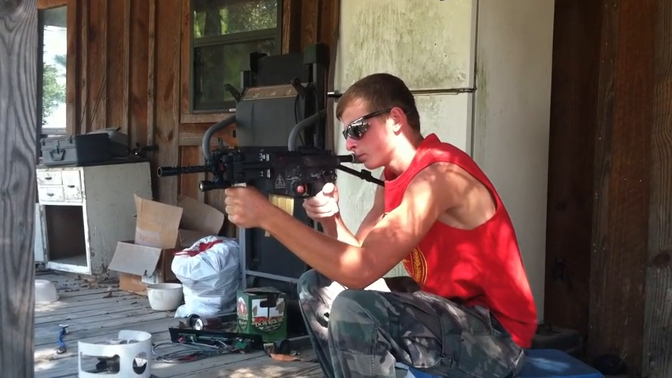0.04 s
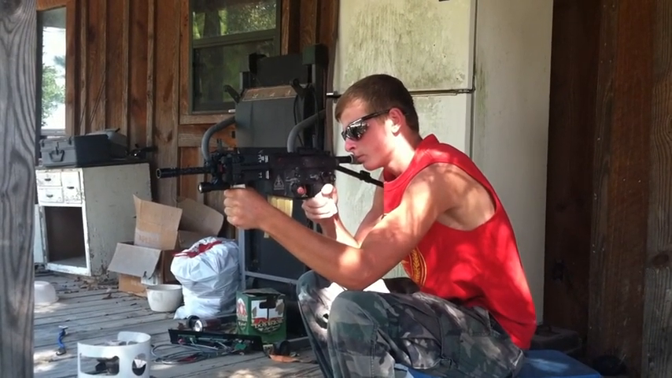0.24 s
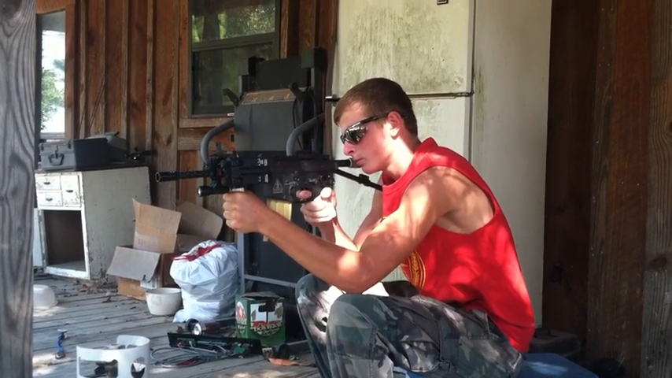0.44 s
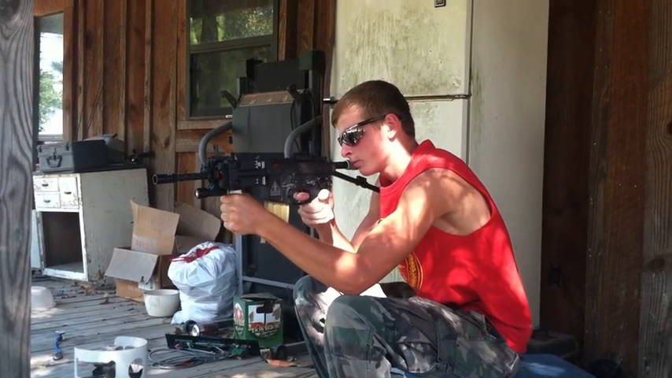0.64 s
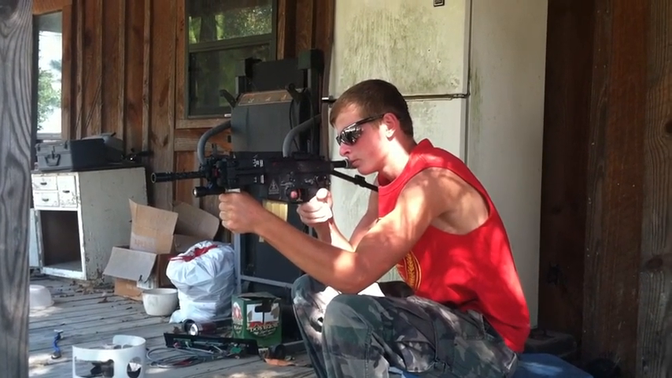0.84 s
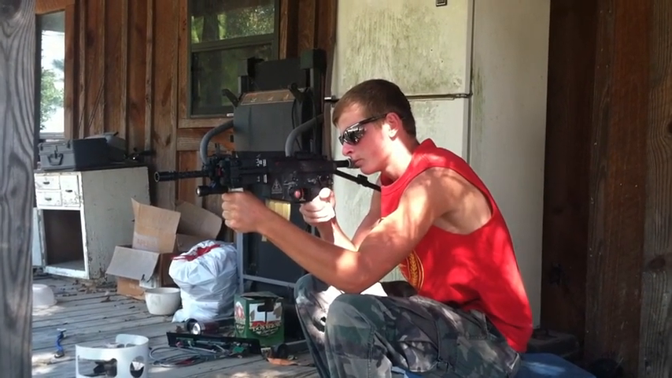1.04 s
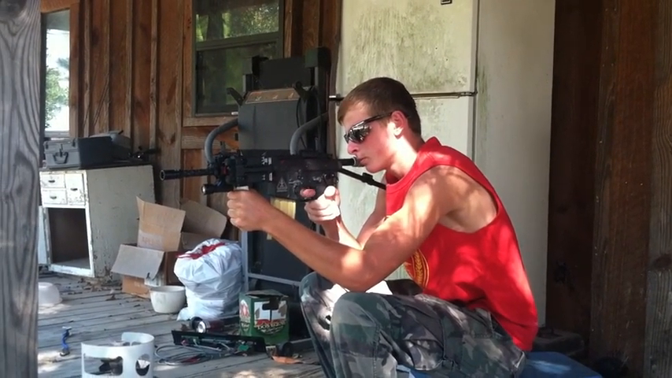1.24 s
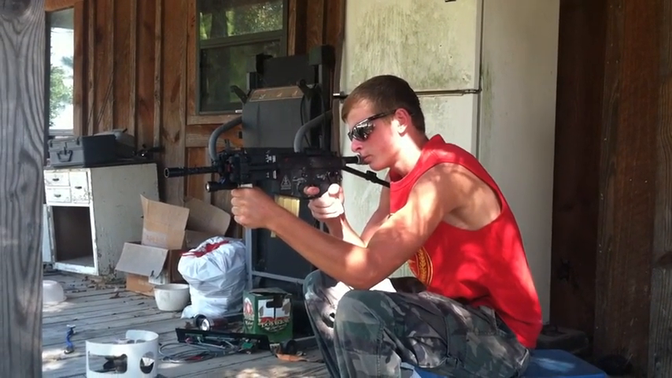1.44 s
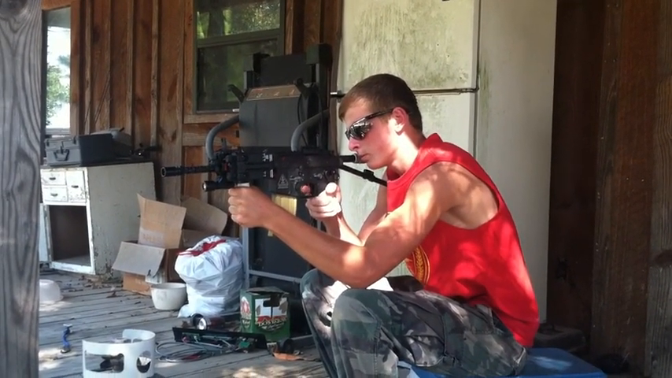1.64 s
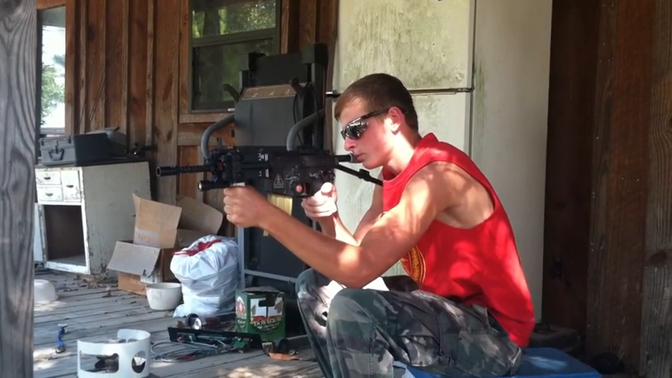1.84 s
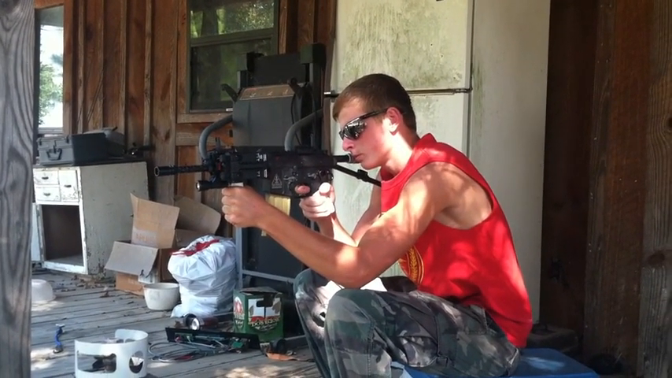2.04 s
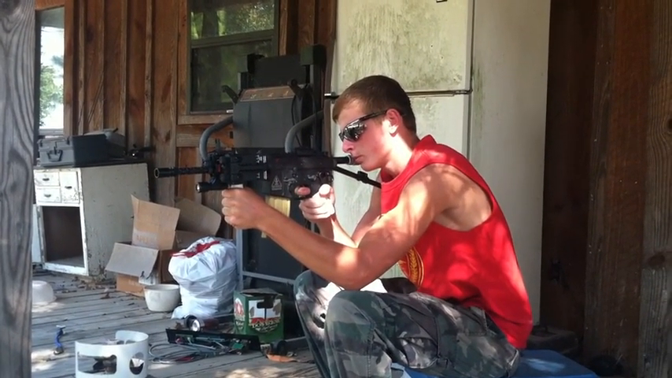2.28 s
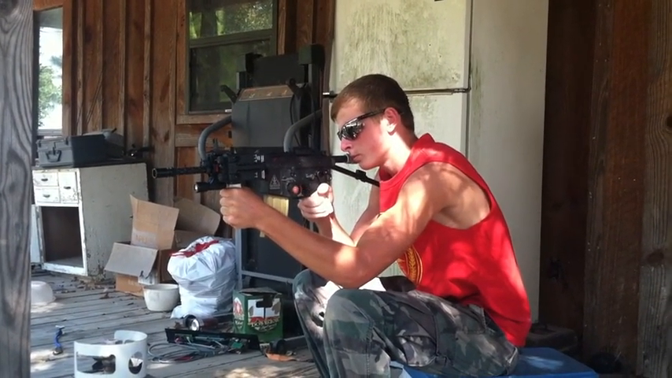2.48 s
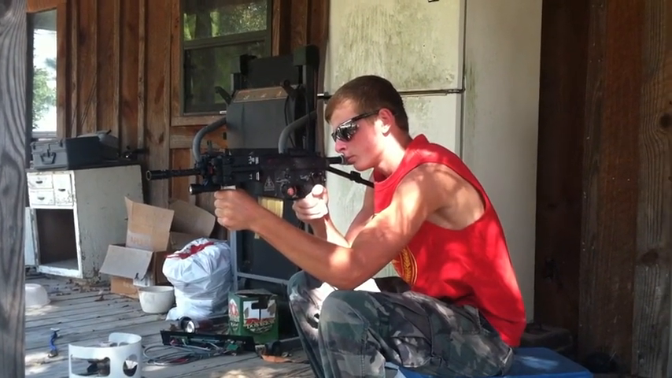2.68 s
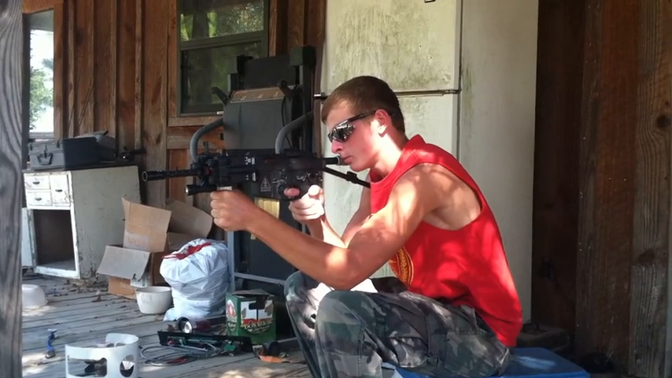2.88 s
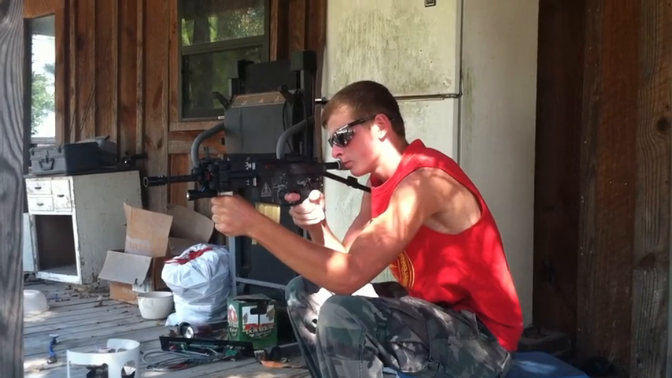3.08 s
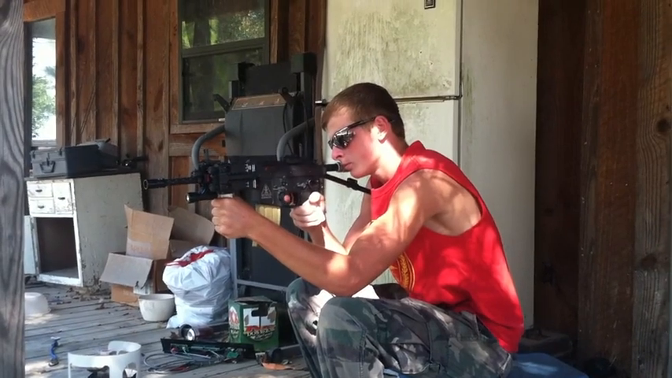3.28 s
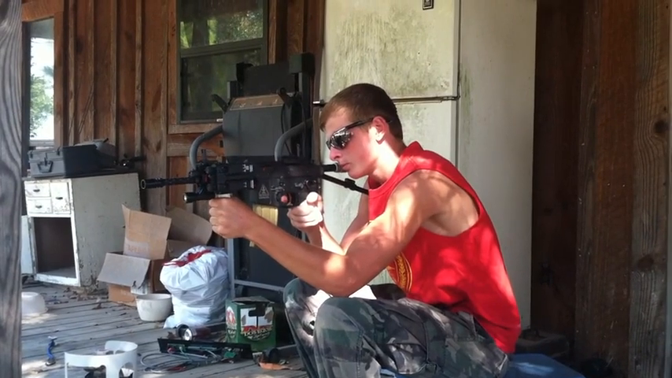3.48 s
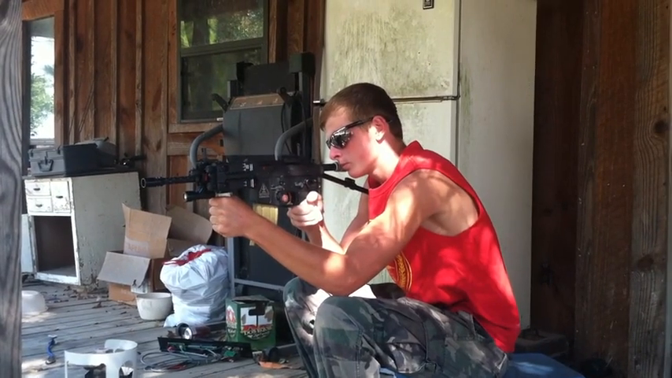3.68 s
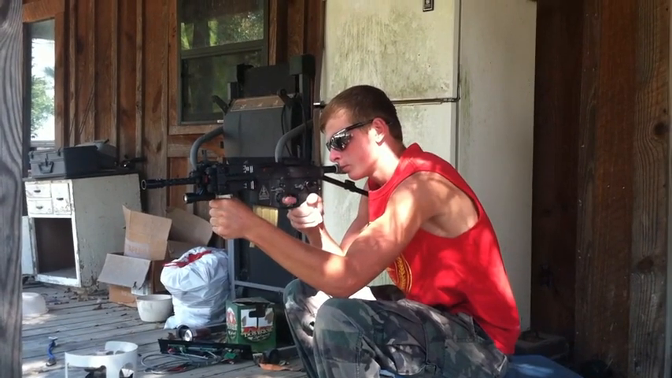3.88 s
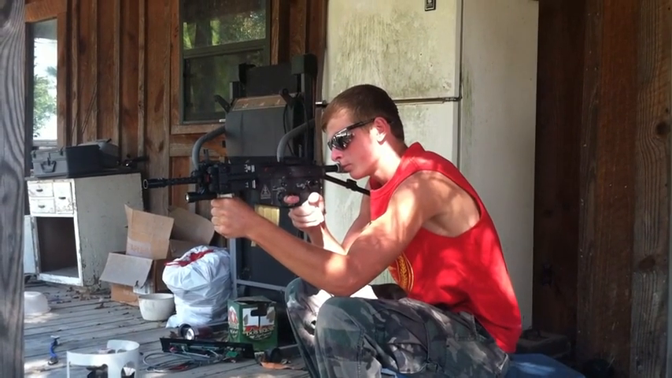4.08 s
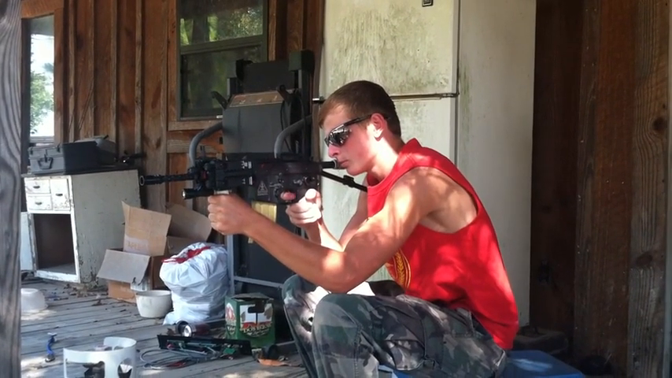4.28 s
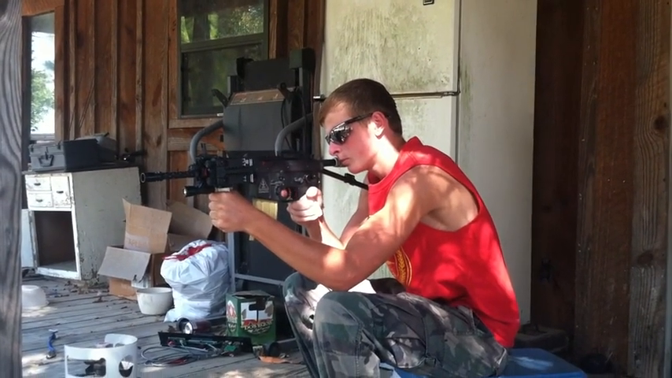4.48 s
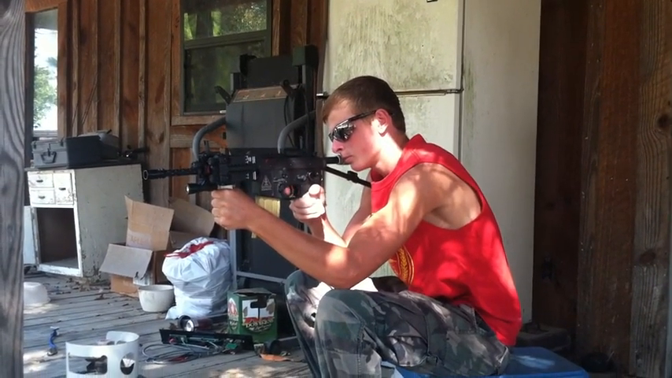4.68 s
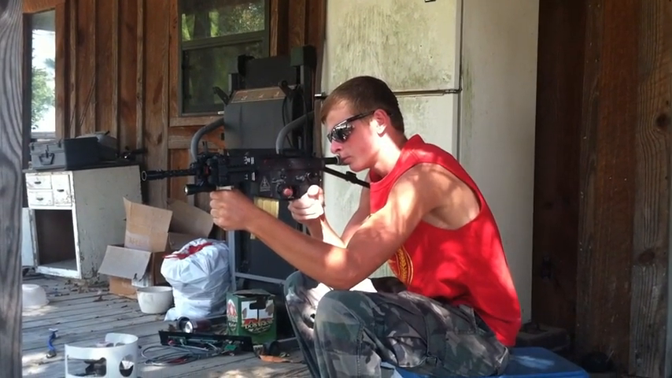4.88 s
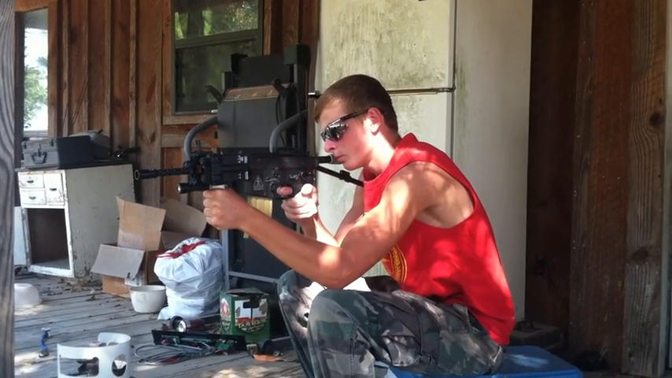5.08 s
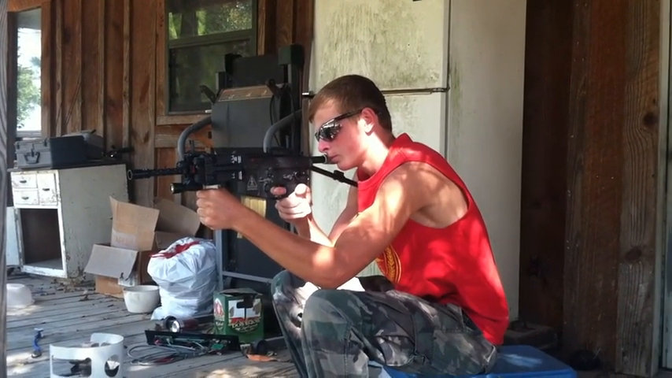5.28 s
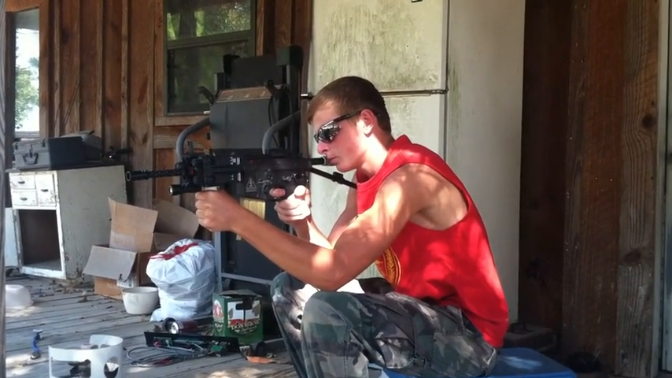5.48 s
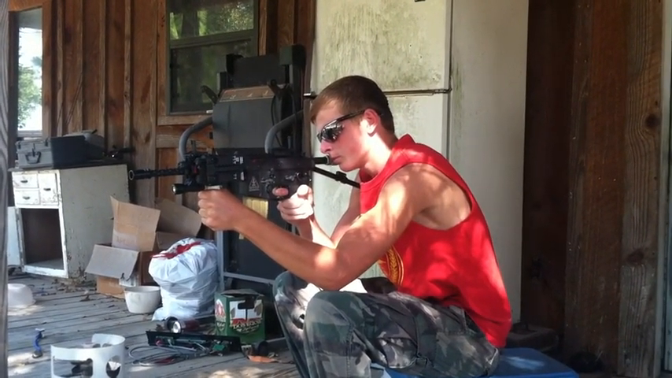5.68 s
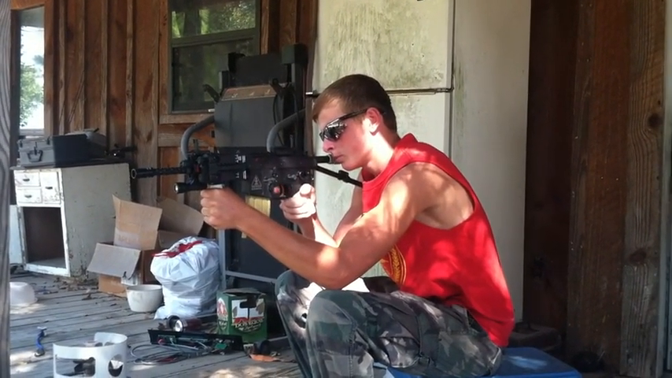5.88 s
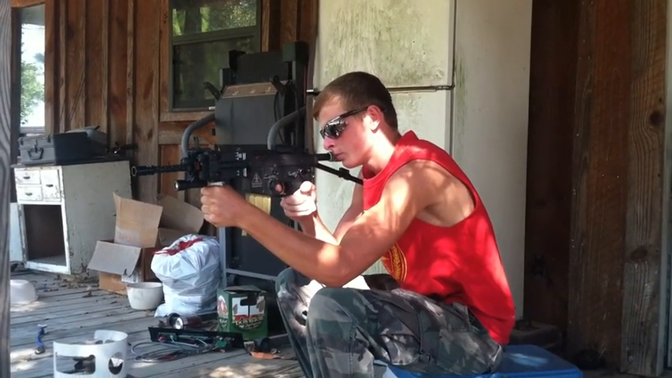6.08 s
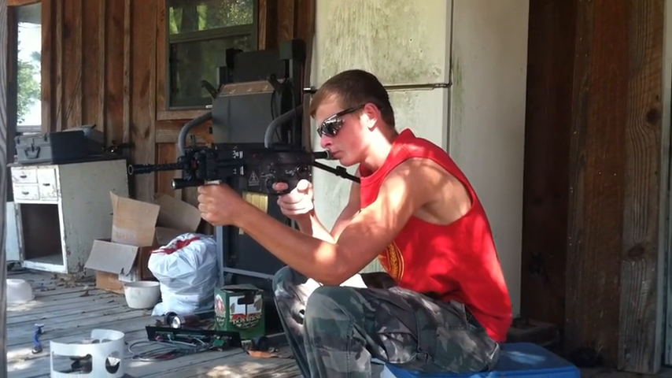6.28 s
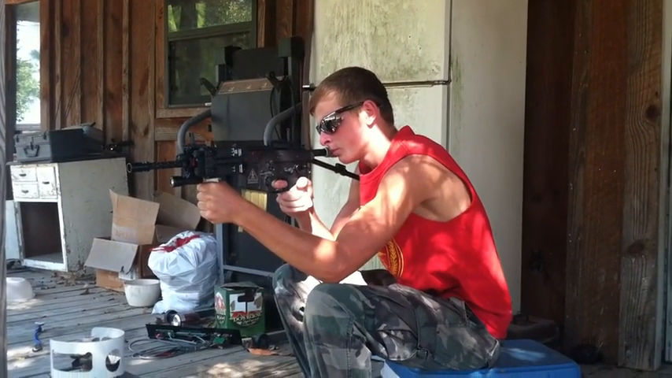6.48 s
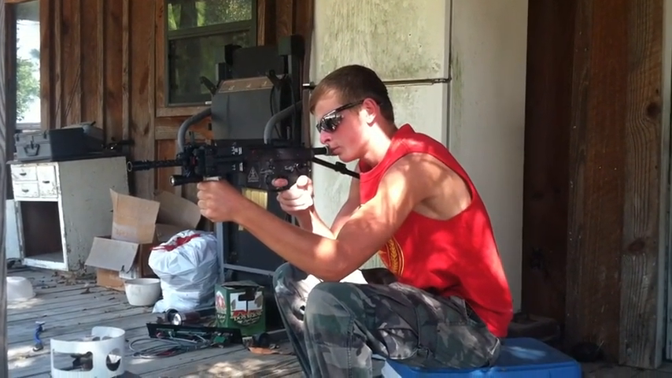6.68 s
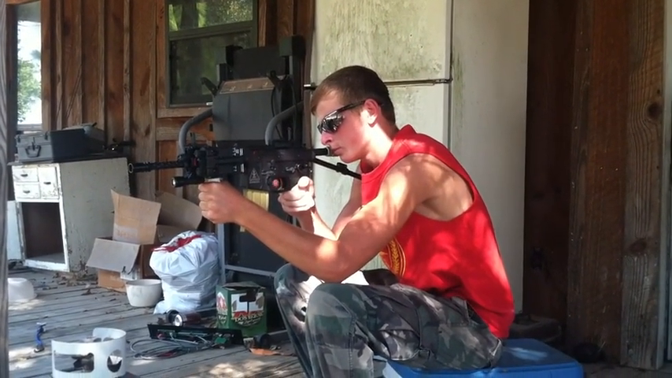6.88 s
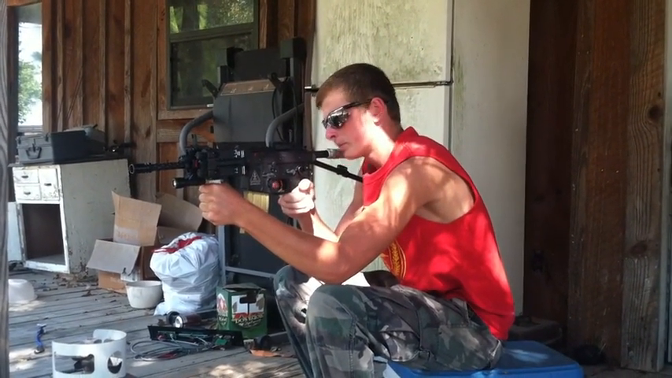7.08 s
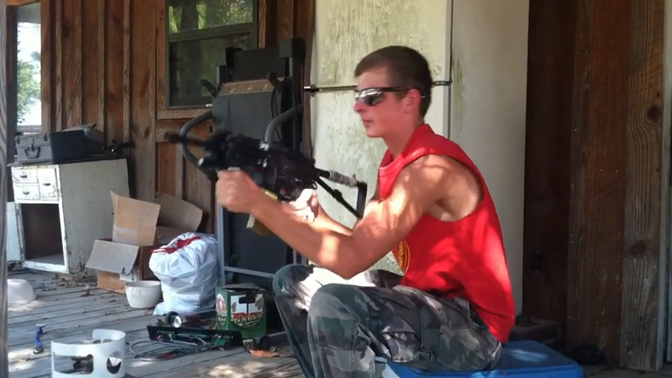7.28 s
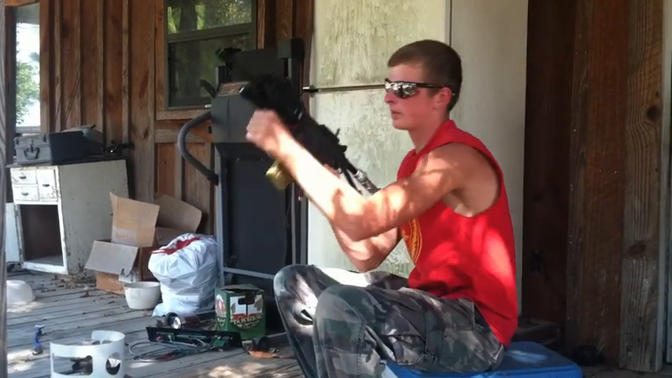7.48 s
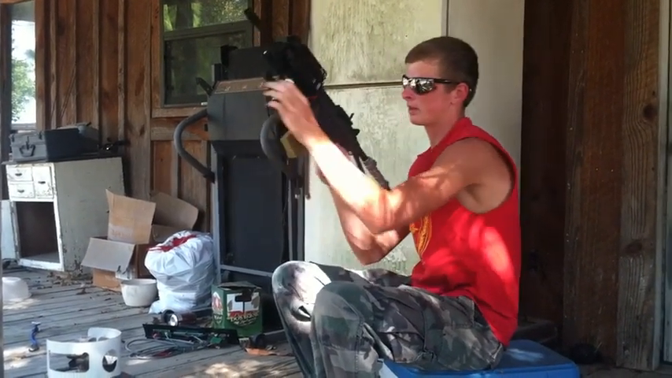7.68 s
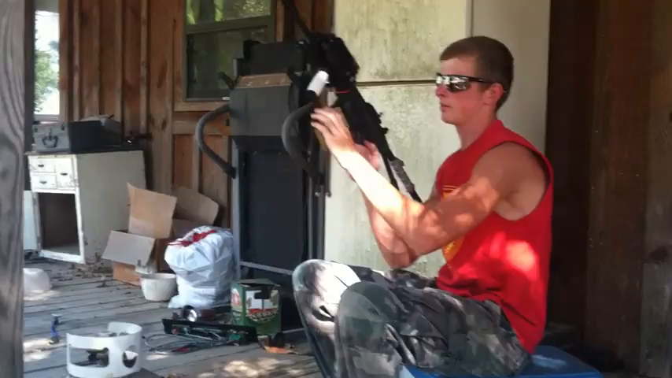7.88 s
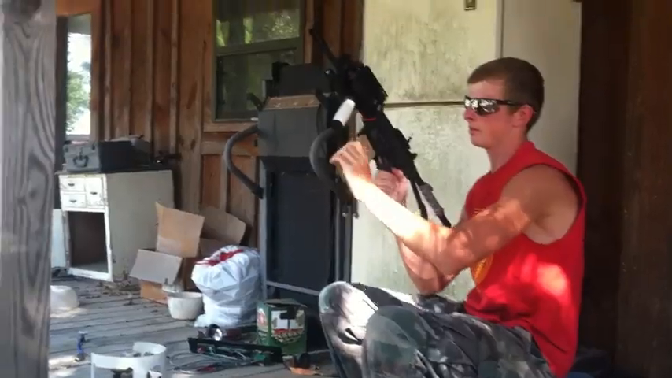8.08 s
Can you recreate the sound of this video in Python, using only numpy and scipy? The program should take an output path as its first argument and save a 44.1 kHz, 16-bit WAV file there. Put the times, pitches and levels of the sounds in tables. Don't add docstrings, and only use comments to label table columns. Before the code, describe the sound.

On an open wooden porch, close by, an electric pellet rifle fires over faint traffic rumble and leaf hiss. One last pop of an earlier burst opens the scene, its pellets smacking a far board at 0.2-0.4 s. Four-shot bursts follow at about 0.6, 1.4, 2.2, 3.0 and 4.1 s, some twelve shots a second: crisp air pop, piston knock, ratcheting gear clatter, with a short motor whirr before each. A weak half-stroke precedes the second. Most bursts are answered a third of a second later by woody smacks with a quick wall echo. A longer burst runs 5.2-5.8 s, smacks until 6.2. At 6.45-6.9 s the magazine empties, and the shots turn hollow and clacky; one last smack lands near 7.0. Then dull and bright ticks at 7.2-7.3, cloth tugs, a sharp snap at 8.0, traffic slightly nearer.

```python
import sys
import numpy as np
from scipy import signal
from scipy.fft import rfft, irfft, next_fast_len
from scipy.io import wavfile
from scipy.ndimage import uniform_filter1d, minimum_filter1d

SR = 44100
rng = np.random.default_rng(int(sys.argv[2]) if len(sys.argv) > 2 else 0)


def magnitude_from_level(level_db):
    exponent = np.asarray(level_db, float) / 20
    return 10 ** exponent


def store_wav(level_fs):
    pcm = np.round(np.clip(np.atleast_2d(level_fs), -1, 1) * 32767)
    wavfile.write(sys.argv[1], SR, pcm.T.astype(np.int16))


N = 358964

# (first shot [s], second shot [s], last shot [s], settled cycle [s])
BURSTS = [
    (.5741, .6625, .8322, .0812),
    (1.4117, 1.4959, 1.6562, .08),
    (2.207, 2.3025, 2.4656, .0827),
    (3.0403, 3.1316, 3.2975, .0811),
    (4.0997, 4.1874, 4.3488, .081),
    (5.1585, 5.2506, 5.8162, .081),
    (6.451, 6.5407, 6.8653, .0815),
]
# (pick-up clatter [dB], winding [dB], winding change [dB/shot], run-out winding [dB])
BURST_EFFORT = [
    (14.5, -21, -25, -25),
    (9.5, -26, -5, -20.5),
    (10, -26, .5, -25.5),
    (11, -26, 1.1, -25),
    (8, -25, 0, -26),
    (11.5, -26.5, -0.26, -23),
    (13.5, -28.5, 1.66, -22.5),
]
# (time [s], pick-up clatter [dB], winding [dB])
LONE_STROKES = [
    (.0102, 8, -24),
    (1.3457, 4.5, -26),
]
# (frequency [Hz], level [dB], swell [ms])
POP_PULSES = [(2850, -1.5, .45), (1800, -11, .65), (6900, -4.5, .32), (9200, -7.5, .19), (14000, -19, .16)]
# (frequency [Hz], level [dB], t60 [s])
BODY_MODES = [(165, -32.5, 0.054), (200, -22.5, 0.049), (322.5, -28.5, 0.052), (472, -20.5, 0.036)]
KNOCK_DELAYS_MS = [-2.8, -1.6, 1.5, 3.2, 4.9, 6.6, 11.8, 15.6, 16.9, 29.5, 36]
KNOCK_LEVELS_DB = [-18, -16, -17, -10, -13, -18, -13, -15, -14, -16, -17]
# (time after pop [ms], pick-up [dB], winding [dB])
GEAR_CYCLE = [(0, -13, 11), (5.76, -29.5, 4), (20.1, -38, -8), (33, -38, -6.5), (48.1, -55.5, -3),
              (60.4, -73, -7), (102, -64, -21.5), (123, -90, -16), (207, -99, -62)]
# (time [s], length [s], winding [dB], whine [dB], whine [Hz])
TRIGGER_PULLS = [
    (0.47, 0.1, -31.5, -32.5, 1410),
    (1.302, 0.075, -29, -25, 1498),
    (1.346, 0.1, -52, -28, 1810),
    (2.128, 0.096, -38, -41, 1480),
    (2.944, 0.1, -30, -38, 1470),
    (3.991, 0.1173, -27, -27, 1530),
    (5.071, 0.091, -31, -38, 986),
    (6.346, 0.11, -31, -32, 1398),
]
# (frequency [Hz], density [dB per Hz])
GEAR_SPECTRUM = [(180, -76), (300, -42), (398, -13), (447, -9), (537, -17), (915, -3), (1150, -13.5),
                 (2360, 2), (3830, -6.5), (7080, -5), (11900, -19), (15000, -38), (16000, -87)]
# (frequency [Hz], width [Hz], level [dB])
CASING_MODES = [(900, 67, 5), (1560, 30, -18), (1757, 230, 16), (2064, 28, 13), (2390, 26, 7),
                (2740, 40, -26), (2803, 9.1, 7), (3070, 120, 5), (3200, 88, 13), (3460, 57, -1),
                (4050, 30, 1), (5200, 120, -3), (5700, 160, 1), (5870, 100, 3)]
# (frequency [Hz], level [dB], t60 [s])
BARREL_MODES = [(800, -9, .022), (2620, -7, .018), (2250, -12, .018), (3950, -15, .025)]
# (time [s], peak [dB], bass [dB], treble [dB], echo [dB])
PELLET_HITS = [(0.1974, -14.5, -15.5, -23, -5), (0.2816, -18, -35, -17, -4), (0.3627, -16, -10.5, -43, -4),
               (0.9292, -17, -15, -28, -6.5), (1.0131, -21, -7, -4.5, 2.5), (1.7623, -15.5, -15, -8, -5.5),
               (1.8493, -20, -14, -18, -4), (2.0078, -15.5, -17.5, -8, -0.5), (2.5596, -20, -5, -6, -1.5),
               (2.6567, -16.5, -9.5, -22, -5), (2.7362, -15.5, -33, -16.5, -5.5),
               (2.817, -21, -3.5, -8.5, 0.5), (3.6553, -33, -26, -3, 2), (4.4606, -15, -15, -8.5, -8.5),
               (4.542, -30, -23, -26, -3), (4.6185, -21, -7, -38, -0.5), (5.9408, -18.5, -13, -8, -12),
               (6.0052, -20, -13, -8, -3.5), (6.086, -19, -15, 0, -2), (6.1657, -21, -6, -8.5, 1),
               (6.9811, -22, -9.5, -8, -9.5)]
# (time [s], frequency [Hz], level [dB], t60 [s])
BOARD_RINGS = [(1.014, 414, -31, 0.046), (1.014, 780, -33, 0.036), (1.014, 3290, -32.5, 0.19),
               (1.014, 4920, -33, 0.094), (1.761, 4000, -42, 0.043), (2.56, 408, -37, .08),
               (3.655, 3900, -43, 0.061), (3.655, 9740, -43, 0.072), (6.086, 810, -27, 0.024),
               (6.167, 2100, -40, .1), (5.94, 900, -36.5, 0.071), (6.98, 4050, -38, 0.025)]
# (time [s], peak [dB], pitch [Hz], t60 [s])
HANDLING_TICKS = [
    (7.168, -27, 1040, 0.021),
    (7.329, -28, 8300, 0.029),
    (7.72, -45, 7500, .03),
    (7.772, -47, 6640, 0.03),
    (7.81, -52, 6000, 0.013),
    (7.985, -47, 5500, 0.036),
    (7.998, -20.5, 8000, 0.026),
    (7.998, -32.5, 3200, 0.1),
    (7.998, -33.5, 1440, 0.094),
]
# (time [s], level [dB], rise [s], t60 [s])
CLOTH_TUGS = [
    (7.326, -46.5, 0.0053, 0.15),
    (7.566, -42, 0.019, 0.31),
    (7.981, -38, 0.021, 0.12),
    (8.121, -58, .02, .3),
]
# (frequency [Hz], density [dB per Hz])
CLOTH_SPECTRUM = [(590, -11), (1000, 1), (1380, -4), (1720, -2.5), (2340, 3.5), (4060, -4), (9000, -4.5),
                  (13200, -23.5), (14000, -55)]
# (frequency [Hz], density [dB per Hz])
YARD_SPECTRUM = [(12, -52), (20, -27.5), (54, -49.5), (119, -6), (263, -1.5), (481, -5.5), (632, -10.5),
                 (832, -6), (980, -8), (1060, -12.5), (1520, -11), (10600, -34.5), (12500, -66),
                 (14000, -53.5)]
# (time [s], level [dB])
TRAFFIC_SWELL = [
    (0, 2),
    (7, 2),
    (8.14, 7.5),
]

EMPTY_FROM_S = 6.6
FIRST_THUMP_DB, THUMP_DB, EMPTY_THUMP_DB = 43, -4, 22.5
BOARD_ECHO_S, PORCH_T60_S = 0.019, 0.45


def rms_one(x):
    return x / np.sqrt(np.mean(x ** 2) + 1e-20)


def band(x, low_hz, high_hz):
    sos = signal.butter(2, [low_hz, min(high_hz, .45 * SR)], "band", fs=SR, output="sos")
    return signal.sosfilt(sos, x)


def ring(x, hz, t60_s):
    r, w = magnitude_from_level(-60 / (t60_s * SR)), 2 * np.pi * hz / SR
    return signal.lfilter([0, np.sin(w)], [1, -2 * r * np.cos(w), r * r], x + 1e-18)


def colour(x, spectrum):
    size = next_fast_len(N)
    hz, level_db = np.transpose(spectrum)
    bin_hz = np.arange(size // 2 + 1) * SR / size
    gain = magnitude_from_level(np.interp(np.log(bin_hz + 1), np.log(hz), level_db))
    return irfft(rfft(x, size) * gain, size)[:N]


def drift(rate_hz):
    knots = rng.standard_normal(int(N / SR * rate_hz) + 2)
    return np.interp(np.arange(N) / SR * rate_hz, np.arange(len(knots)), knots)


def add(out, start_s, sound):
    i = round(start_s * SR)
    part = sound[max(-i, 0):max(N - i, 0)]
    out[max(i, 0):max(i, 0) + len(part)] += part


def burst(t60_s, low_hz, high_hz, rise_s):
    t = np.arange(SR // 5) / SR
    noise = rms_one(band(rng.standard_normal(len(t)), low_hz, high_hz))
    return noise * (1 - np.exp(-t / rise_s)) * magnitude_from_level(-60 * t / t60_s)


def strokes():
    rows = [(s, pick_db, THUMP_DB, wind_db) for s, pick_db, wind_db in LONE_STROKES]
    for (first, second, last, cycle), effort in zip(BURSTS, BURST_EFFORT):
        pick_db, wind_db, sag_db, last_db = effort
        shots = [first, *np.arange(second, last - cycle / 2, cycle), last]
        for k, s in enumerate(shots):
            thump_db = THUMP_DB if k else FIRST_THUMP_DB
            if s > EMPTY_FROM_S:
                thump_db = EMPTY_THUMP_DB
            rows.append((s, pick_db, thump_db, last_db if s == last else wind_db + sag_db * k))
    return sorted(rows)


def muzzle_pulse(t, lead_s):
    pulses = []
    for hz, db, swell_ms in POP_PULSES:
        u = np.maximum(1 + (t - lead_s) * 1e3 / swell_ms, 0)
        pulses.append(-magnitude_from_level(db) * np.cos(2 * np.pi * hz * (t - lead_s)) * (u * np.exp(1 - u)) ** 2)
    return -sum(pulses[:2]), np.roll(sum(pulses[2:]), 8)


def body_thump(t):
    modes = sum(magnitude_from_level(db) * np.sin(2 * np.pi * hz * t) * magnitude_from_level(-60 * t / t60_s) for hz, db, t60_s in BODY_MODES)
    return modes * (1 - np.exp(-t / 0.0039))


def pops():
    t, lead_s = np.arange(SR // 10) / SR, 1e-3
    dull, bright = muzzle_pulse(t, lead_s)
    thump = body_thump(t)
    rows = strokes()
    times = [-1] + [row[0] for row in rows] + [np.inf]
    chance = rng.standard_normal((len(rows), len(KNOCK_DELAYS_MS) + 1))
    out = np.zeros(N)
    for last, (s, _, thump_db, _), after, vary in zip(times, rows, times[2:], chance):
        force = magnitude_from_level(-10 if after - s < .07 else 0)
        add(out, s - lead_s, force * (dull + bright * magnitude_from_level(1.2 * vary[-1])))
        add(out, s - .0016, magnitude_from_level(0.044 * thump_db + 3.1 * vary[0]) * thump)
        rattle = burst(.022, 1300, 3600, .001) + .8 * burst(.022, 4500, 10000, .002)
        add(out, s - .0034, magnitude_from_level(-20.0) * rattle)
        if s - last > .2:
            add(out, s - .0075, magnitude_from_level(-18.0) * rattle)
        for ms, db, v in zip(KNOCK_DELAYS_MS, KNOCK_LEVELS_DB, vary):
            add(out, s - lead_s + ms / 1e3, force * magnitude_from_level(db + 1.5 * v) * (dull + .2 * bright))
    return signal.sosfilt(signal.butter(3, 120, "high", fs=SR, output="sos"), out)


def empty_barrel():
    out, clicks = np.zeros(N), np.zeros(N)
    for s, _, thump_db, _ in strokes():
        if s > EMPTY_FROM_S:
            clicks[round((s - .0001) * SR)] = magnitude_from_level(rng.standard_normal())
            clack = magnitude_from_level(-10.0) * burst(0.019, 3300, 4000, .0003)
            clack += magnitude_from_level(-6.0) * burst(0.063, 7300, 9550, 0.00015)
            hollow = magnitude_from_level(-12.5) * burst(0.2, 630, 1140, 0.016)
            add(out, s - .0015, magnitude_from_level(thump_db - 29.0) * (hollow + clack))
    return out + sum(magnitude_from_level(db) * ring(clicks, hz, t60_s) for hz, db, t60_s in BARREL_MODES)


def teeth(size, per_s, spread_db):
    marks = rng.random(size) < per_s / SR
    contacts = marks * rng.standard_normal(size) * magnitude_from_level(spread_db * rng.standard_normal(size))
    return rms_one(contacts + 0.18 * rng.standard_normal(size))


def pinion_whine(done, hz):
    peak_at = .65
    bend = np.where(done < peak_at, 1.1, .6)
    turn = 2 * np.pi * np.cumsum(hz * (1 - bend * (done - peak_at) ** 2)) / SR
    gears_mesh = 0.18 * np.sin(.62 * turn) + 0.18 * np.sin(1.4 * turn) + 0.51 * np.sin(2 * turn)
    return np.sin(done ** 1.63 * np.pi) ** 2.5 * (np.sin(turn) + gears_mesh)


def casing(x):
    return sum(magnitude_from_level(db) * np.sqrt(width) * ring(x, hz, 5.4 / width) for hz, width, db in CASING_MODES)


def gears():
    ms, pick_db, wind_db = np.transpose(GEAR_CYCLE)
    t = np.arange(SR // 4) / SR
    pick_up = magnitude_from_level(np.interp(t * 1e3, ms, pick_db))
    winding = magnitude_from_level(np.interp(t * 1e3, ms, wind_db))
    engaged = 1 - np.exp(-t / .006)
    same = teeth(len(t), per_s=1900, spread_db=-1.5)
    drive, whine = np.zeros(N), np.zeros(N)
    rows = strokes()
    for (s, pick, _, wind), after in zip(rows, [row[0] for row in rows[1:]] + [np.inf]):
        dip = np.clip((after - s - t) / 0.012 - .2, 0, 1)
        effort = magnitude_from_level(-2.0) * np.hypot(magnitude_from_level(pick) * pick_up, magnitude_from_level(wind) * winding) * dip * engaged
        add(drive, s, effort * (0.81 * same + 1.457 * teeth(len(t), per_s=2500, spread_db=1.5)))
    for s, length_s, wind, whine_db, hz in TRIGGER_PULLS:
        done = np.clip(t / length_s, 0, 1)
        load = magnitude_from_level(wind) * np.sin(np.pi * done ** 0.91) ** 1.82
        add(drive, s, load * teeth(len(t), per_s=3000, spread_db=-3.5))
        add(whine, s, magnitude_from_level(whine_db) * pinion_whine(done, hz))
    whine *= magnitude_from_level(3.5 * drift(350) + 3 * drift(80))
    unit = rng.standard_normal(N)
    air = colour(drive, GEAR_SPECTRUM) / np.std(colour(unit, GEAR_SPECTRUM))
    modes = casing(drive) / np.std(casing(unit))
    return 0.91 * air + 0.28 * modes + whine


def board_rings():
    out, t = np.zeros(N), np.arange(SR // 4) / SR
    for s, hz, db, t60_s in BOARD_RINGS:
        twin = np.sin(2 * np.pi * (1.01 * hz + 25) * t + rng.uniform(0, 2 * np.pi))
        note = magnitude_from_level(db - 60 * t / t60_s) * (1 - np.exp(-t / .0008))
        note *= np.sin(2 * np.pi * hz * t) + .6 * twin
        add(out, s, note)
        add(out, s + BOARD_ECHO_S, 1.74 * note)
    return out


def pellets():
    out = np.zeros(N)
    for s, db, bass_db, treble_db, echo_db in PELLET_HITS:
        crack = burst(0.0042, 850, 3400, .0001) + magnitude_from_level(treble_db) * burst(0.0065, 3700, 7300, .0001)
        body = burst(0.027, 1920, 2730, 0.00099)
        body += magnitude_from_level(bass_db) * burst(0.063, 236, 940, 0.00025)
        body += magnitude_from_level(treble_db + 7.5) * burst(0.02, 6100, 9700, 0.0018)
        smack = magnitude_from_level(db + 1.0) * crack + magnitude_from_level(db - 7.0) * body
        scatter = burst(0.19, 1360, 3460, 0.017) + magnitude_from_level(treble_db) * burst(0.29, 2800, 7300, 0.0072)
        wall_treble = magnitude_from_level(db + echo_db - 17.5) * burst(0.021, 4500, 7360, 0.00084)
        add(out, s, smack)
        add(out, s + BOARD_ECHO_S, magnitude_from_level(echo_db) * smack + wall_treble)
        add(out, s, magnitude_from_level(db + echo_db - 6.5) * scatter)
    return out + board_rings()


def cloth():
    t = np.arange(N) / SR
    level = magnitude_from_level(-57.5) * np.clip((t - 7.2) / 0.055, 0, 1)
    for s, db, rise_s, t60_s in CLOTH_TUGS:
        since = np.maximum(t - s, 0)
        level += magnitude_from_level(db - 60 * np.maximum(since - rise_s, 0) / t60_s) * np.minimum(since / rise_s, 1)
    level *= magnitude_from_level(2.3 * drift(60))
    return level * rms_one(colour(rng.standard_normal(N), CLOTH_SPECTRUM))


def handling():
    out = np.zeros(N)
    for s, db, hz, t60_s in HANDLING_TICKS:
        add(out, s, magnitude_from_level(db - 3.5) * burst(t60_s, hz / 1.18, hz * 1.12, 0.00056))
    for s, db, hz in [(7.58, -42, 8840), (8.05, -64.5, 6900)]:
        add(out, s, magnitude_from_level(db) * burst(0.14, hz - 60, hz + 60, .01))
    return out + cloth()


def porch(x):
    t = np.arange(SR // 2) / SR
    noise = rng.standard_normal(len(t))
    tail = band(noise, 180, 6000) * magnitude_from_level(-60 * t / PORCH_T60_S)
    tail += band(noise, 4300, 9900) * magnitude_from_level(-60 * t / (0.43 * PORCH_T60_S))
    tail *= 1 - np.exp(-t / 0.0099)
    return signal.fftconvolve(x, tail / np.sqrt(np.sum(tail ** 2)))[:N]


def yard():
    air = rms_one(colour(rng.standard_normal(N), YARD_SPECTRUM))
    rumble = band(air, 20, 950)
    hiss = air - rumble
    swell_db = np.interp(np.arange(N) / SR, *np.transpose(TRAFFIC_SWELL))
    return magnitude_from_level(-49) * (rumble * magnitude_from_level(1.36 * drift(5.7) + swell_db) + hiss * magnitude_from_level(1.1 * drift(2.65)))


def scene():
    pop = pops() + empty_barrel()
    near = gears() + pellets() + handling()
    return (pop + near + porch(magnitude_from_level(-21.0) * pop + magnitude_from_level(-17) * near) + yard())[None]


def low_pass(x):
    return signal.sosfilt(signal.butter(12, 16640, fs=SR, output="sos"), x)


def record(dry):
    x = signal.sosfilt(signal.cheby2(8, 60, 17000, fs=SR, output="sos"), dry)
    over_db = np.maximum(20 * np.log10(np.abs(x[0]) / .95 + 1e-9), 0)
    release_db = 110 * np.arange(N) / SR
    held_db = np.maximum.accumulate(over_db + release_db) - release_db
    ahead_db = -minimum_filter1d(-held_db, size=901)
    mix = x * magnitude_from_level(-uniform_filter1d(ahead_db, size=441))
    return low_pass(mix)


dry = scene()
out = record(dry)
store_wav(out)
```